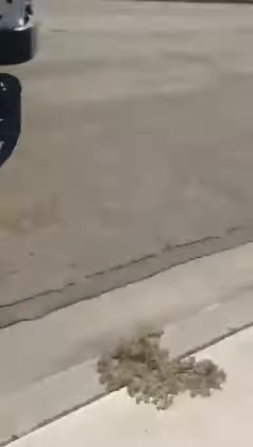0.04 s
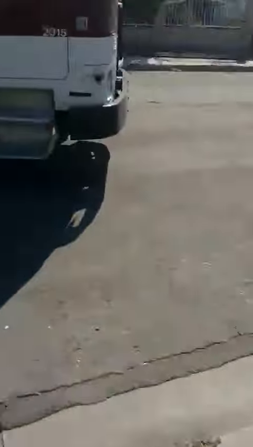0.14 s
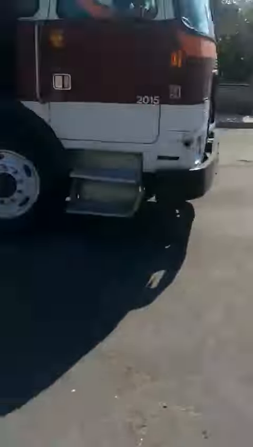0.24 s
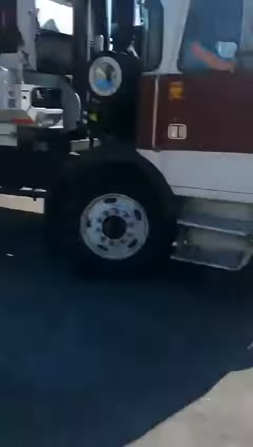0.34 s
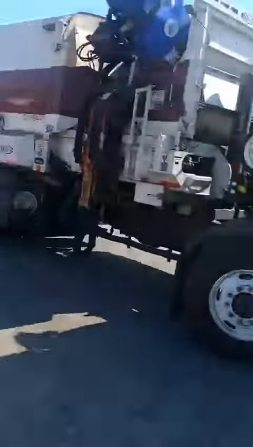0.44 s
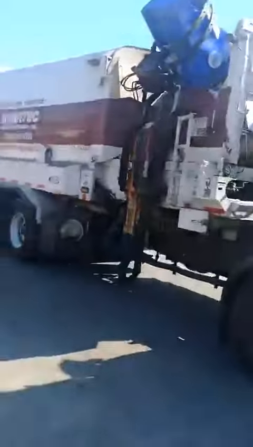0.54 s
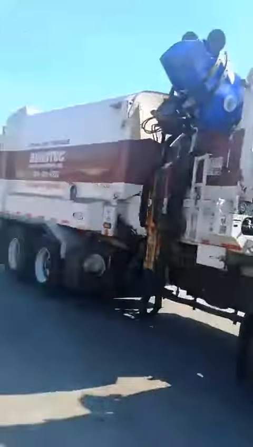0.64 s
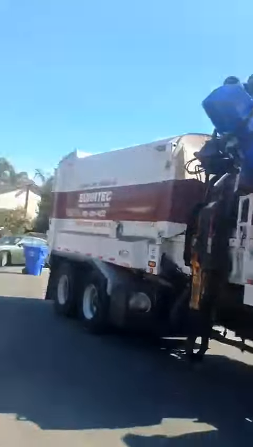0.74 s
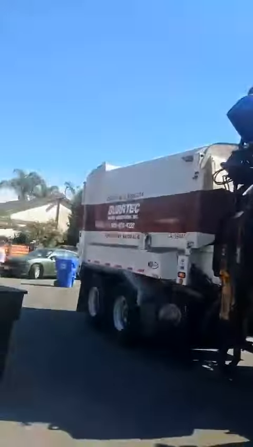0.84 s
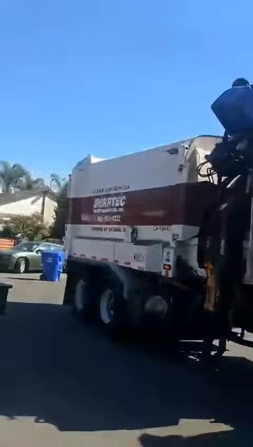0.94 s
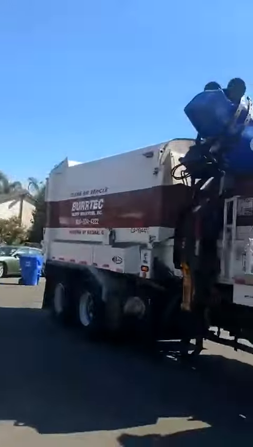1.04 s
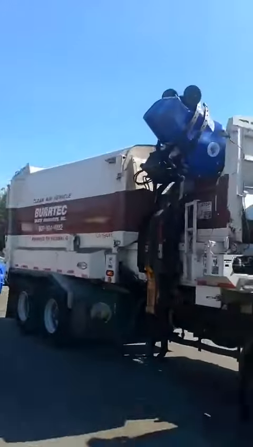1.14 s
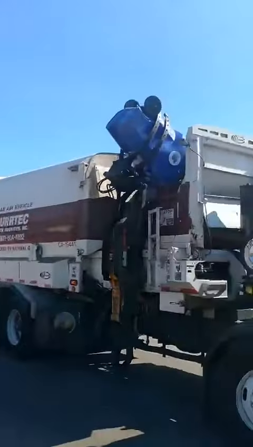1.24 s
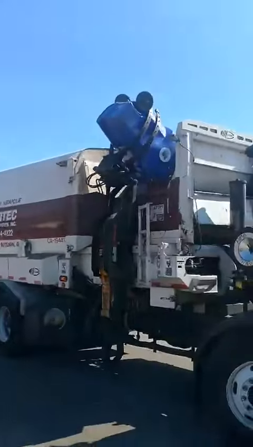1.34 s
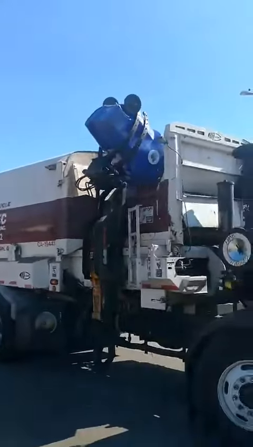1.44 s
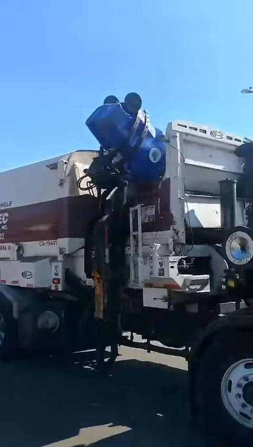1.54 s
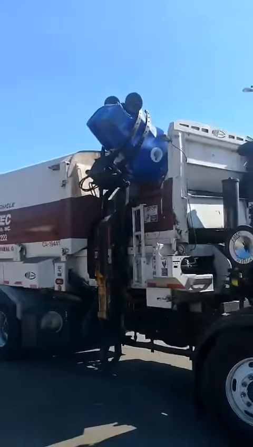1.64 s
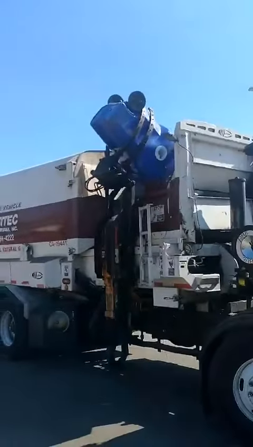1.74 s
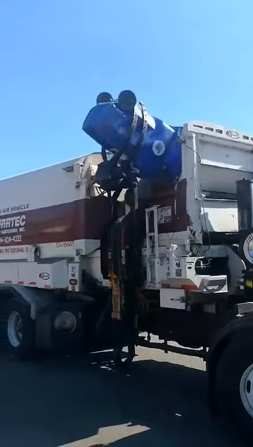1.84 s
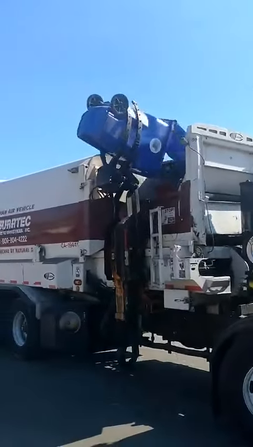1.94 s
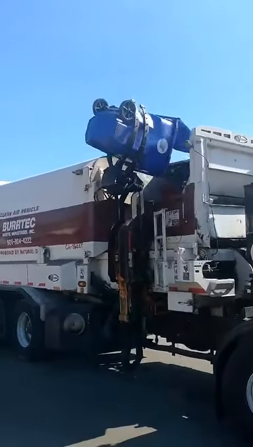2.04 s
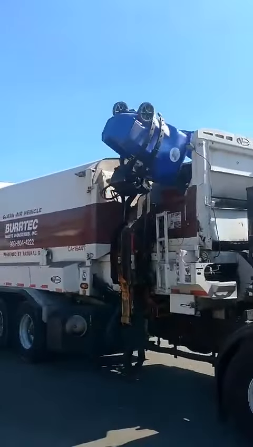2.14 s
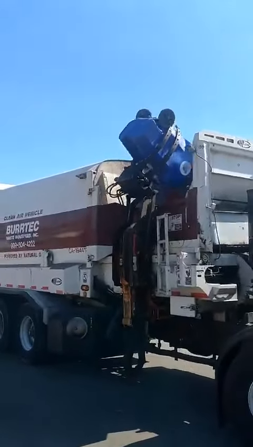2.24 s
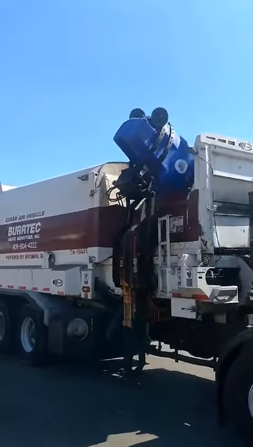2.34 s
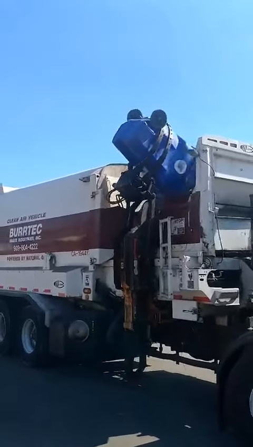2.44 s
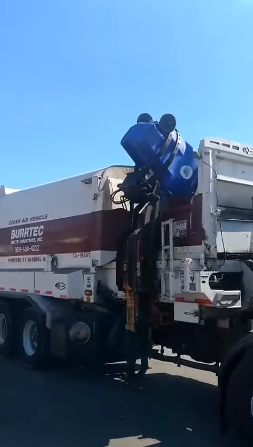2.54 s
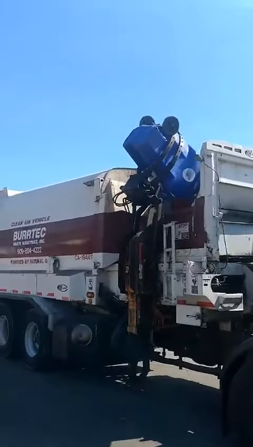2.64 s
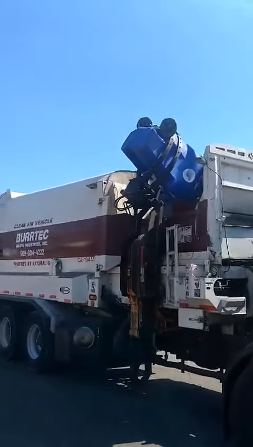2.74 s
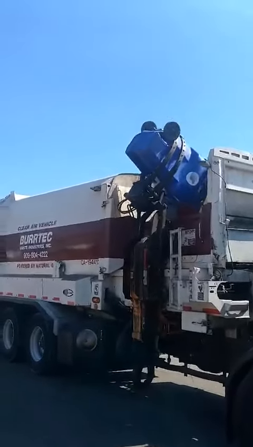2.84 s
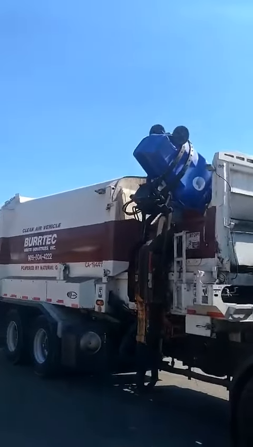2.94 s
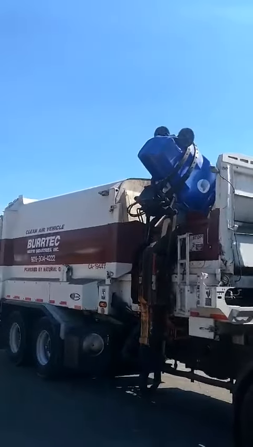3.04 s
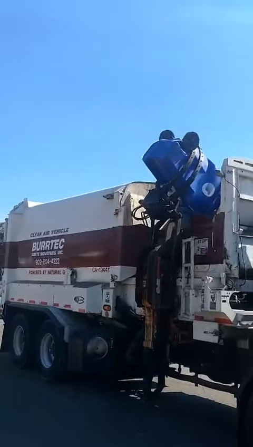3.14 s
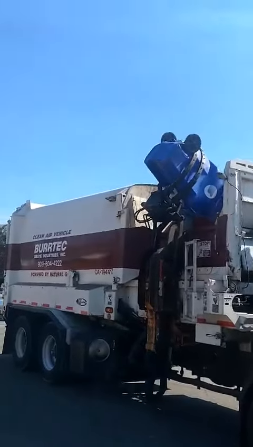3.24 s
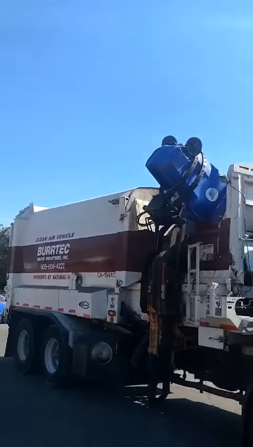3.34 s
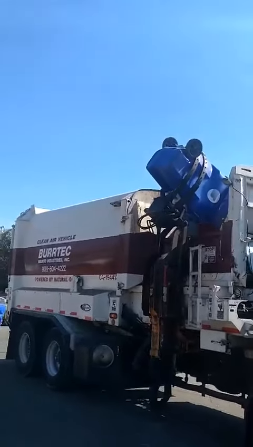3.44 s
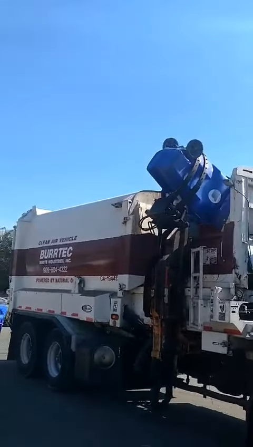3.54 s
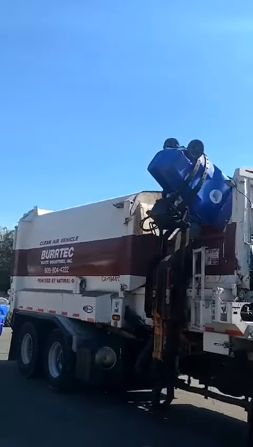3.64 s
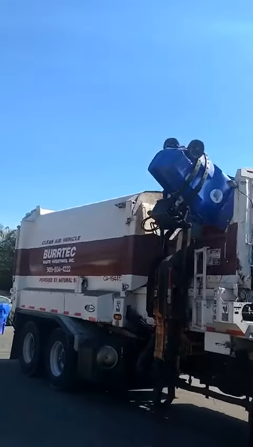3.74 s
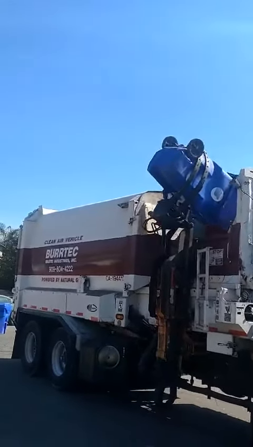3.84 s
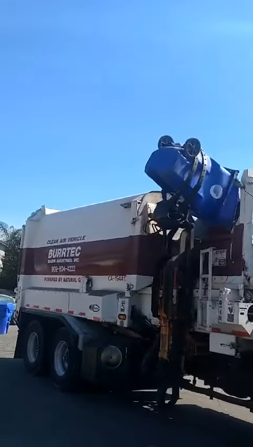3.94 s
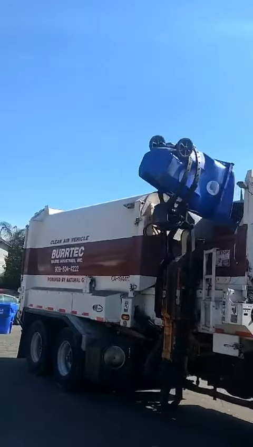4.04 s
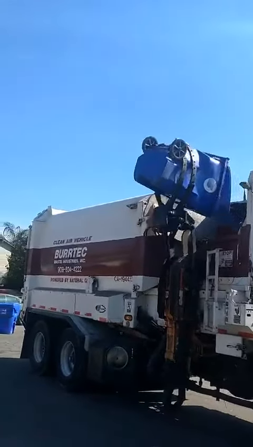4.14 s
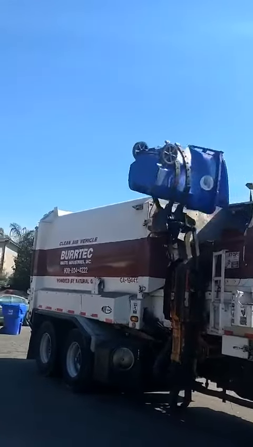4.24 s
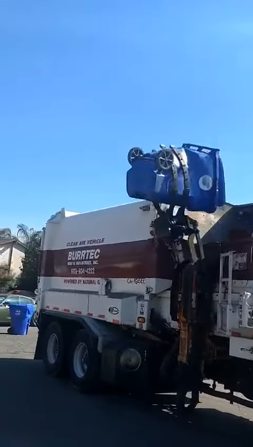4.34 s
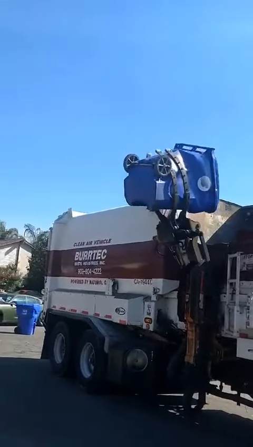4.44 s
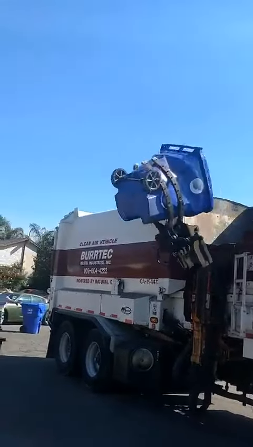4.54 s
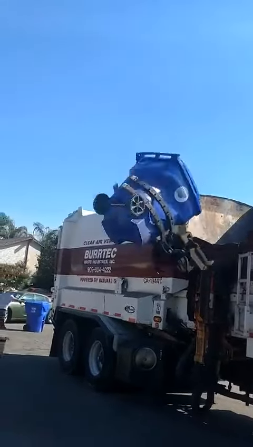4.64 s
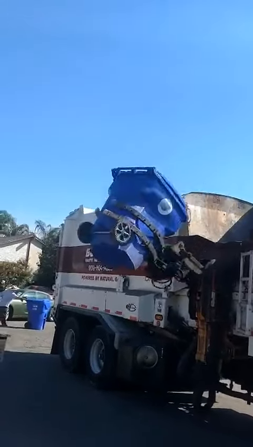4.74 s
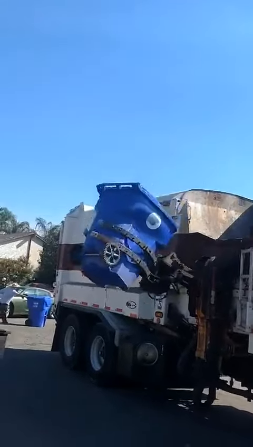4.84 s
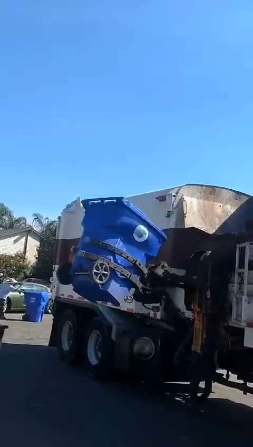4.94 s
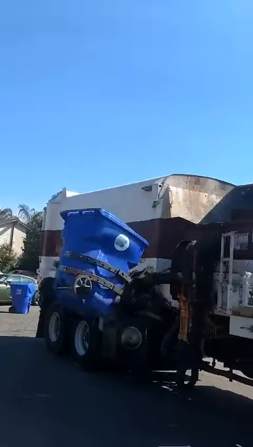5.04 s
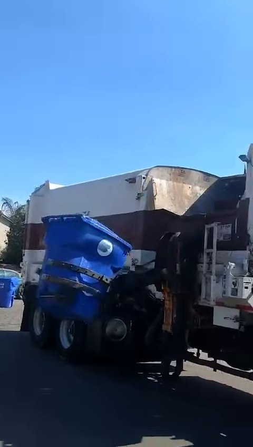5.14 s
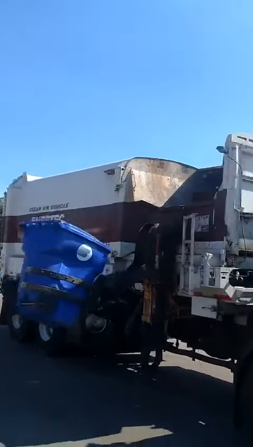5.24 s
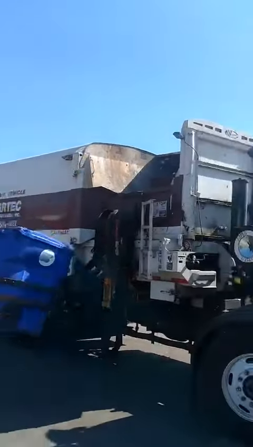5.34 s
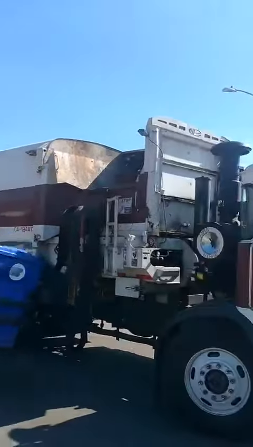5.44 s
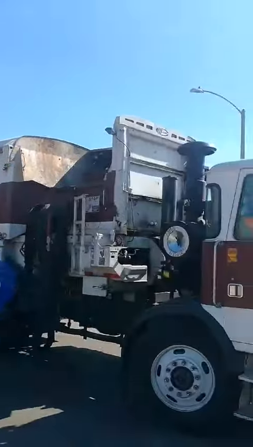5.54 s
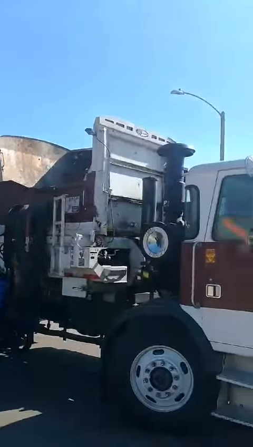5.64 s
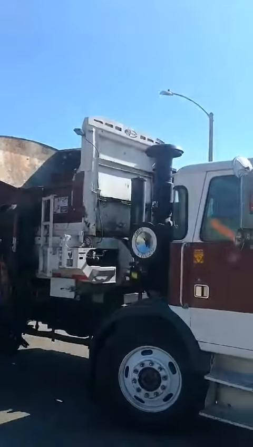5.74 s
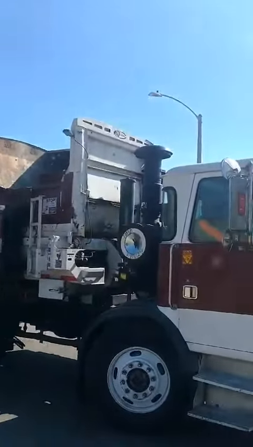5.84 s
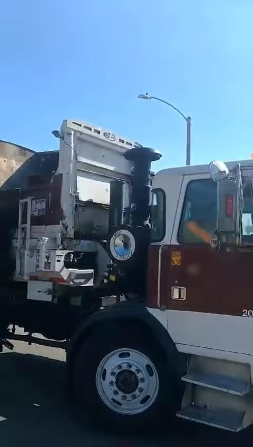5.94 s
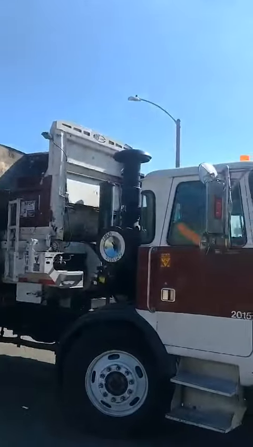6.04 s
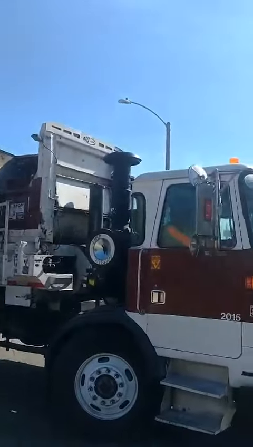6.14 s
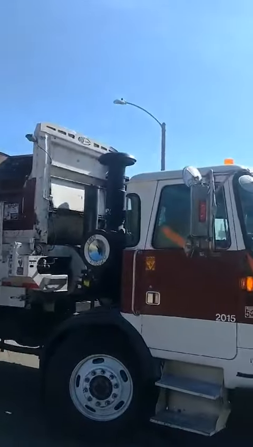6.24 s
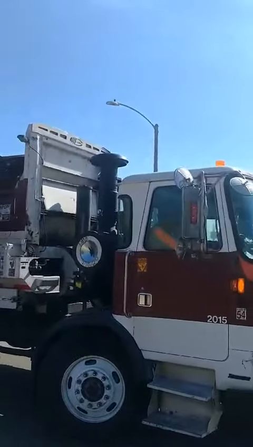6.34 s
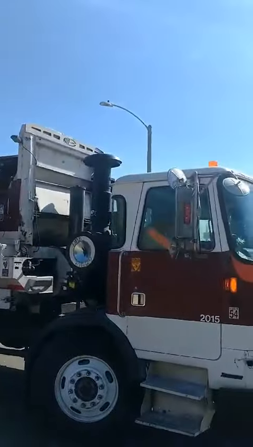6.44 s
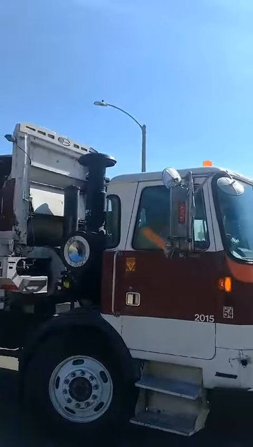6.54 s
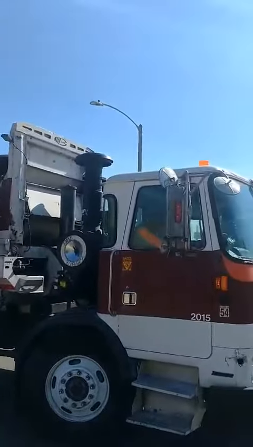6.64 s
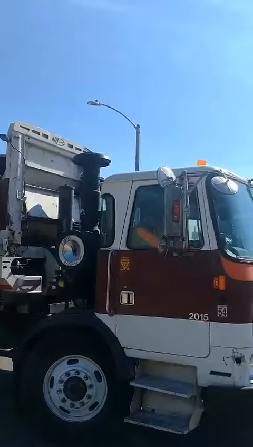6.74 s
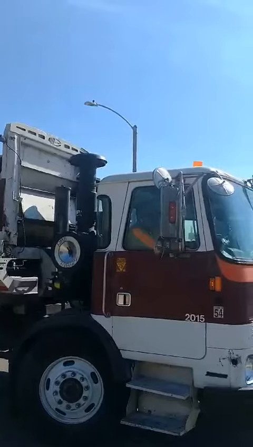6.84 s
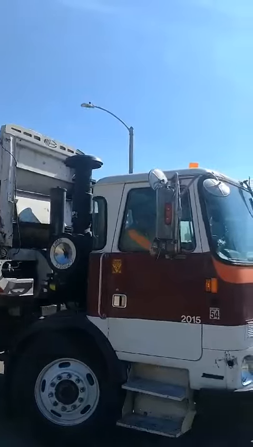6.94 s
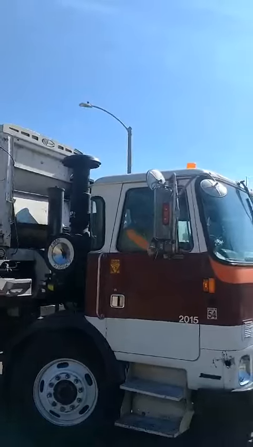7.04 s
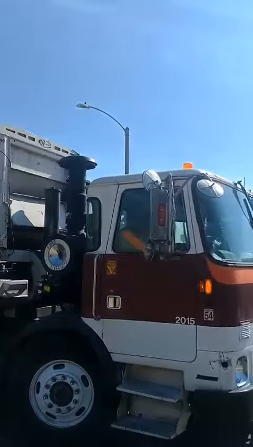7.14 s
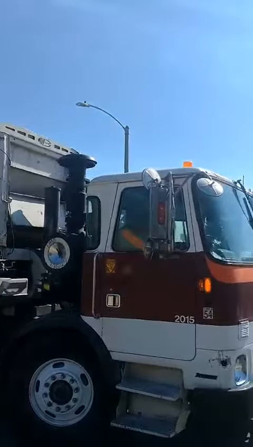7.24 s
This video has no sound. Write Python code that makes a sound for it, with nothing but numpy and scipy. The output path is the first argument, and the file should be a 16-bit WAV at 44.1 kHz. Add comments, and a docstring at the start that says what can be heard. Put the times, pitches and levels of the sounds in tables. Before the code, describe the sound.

Outdoors on a street, very close, a garbage truck idles with a deep throb of around 36 to 40 firings per second under a coarse pump whir. From 0 to 0.9 s a plastic bin is shaken hard against the steel hopper: loud cracks, boomy thuds, dense rattle, short falling moans and a thin pulsing squeak. From 1 to 2 s it eases to scattered clinks and knocks with narrow valve whine. From 2.05 to 3.3 s violent shaking returns in quick bursts, hollow wall tones around 400 Hz and sharp bangs. From 3.5 to 4.5 s comes a lull of engine, hiss and faint moans. From 4.6 to 5.7 s the bin is lowered with moderate clunks and rumble. From 5.8 to 6.7 s a last run of cracks and thuds, then mostly idle until 7.3 s. Handheld stereo, left-heavy, muffled above 8 kHz, distorting on peaks.

```python
"""In a street, close by, a garbage truck idles: a throbbing engine of low orders, a whirring pump of coloured noise.
From the start its arm shakes a plastic bin over the steel hopper: noise rumbles and rattles under struck
cracks, thuds and clinks, with moans and hollow wall tones as gliding sines. After a lull with hissing valves
the bin is set down in further blows, and the listener turns from arm to cab.
Two close microphone ports in a moving hand, left side to the truck, overload on the loudest clatter."""
import sys
import numpy as np
from scipy import signal
from scipy.fft import rfft, irfft
from scipy.io import wavfile
from scipy.ndimage import uniform_filter1d

SR = 44100
rng = np.random.default_rng(int(sys.argv[2]) if len(sys.argv) > 2 else 0)


def wrap_up_sound(samples):
    """Save the sound to the file named by the first command line argument, as 16-bit audio."""
    columns = np.atleast_2d(samples).T
    # keep every value between -1 and 1, then stretch to whole-number steps
    tamed = np.clip(columns, -1, 1)
    steps = np.round(tamed * 32767).astype(np.int16)
    wavfile.write(sys.argv[1], SR, steps)


N = 321489
T = np.arange(N) / SR
HZ = np.fft.rfftfreq(N, 1 / SR)

# Levels in the tables are relative within their layer.
# Pump and fan from the street. Each row: time in seconds, level in dB.
WHIRR_LEVEL = [(0, -40.5), (.8, -25.5), (1.8, -29), (2.6, -23), (3.35, -33), (4.3, -36.5), (5.5, -32.5),
               (5.9, -32), (6.5, -33), (7.0, -34), (7.29, -32.5)]
# Their noise facing the arm, then facing the cab. Each row: frequency in Hz, density in dB per Hz.
WHIRR_FACING_ARM = [(50, -15), (100, -9), (209, -5.5), (389, -3), (659, -17.5), (1270, -3), (1420, -4),
                    (2150, -18.5), (3130, -15), (4150, -15.5), (4910, -19), (6630, -12.5), (8000, -21),
                    (10400, -66.5), (17600, -120)]
WHIRR_FACING_CAB = [(50, -15), (100, -11), (278, -7), (470, -5.5), (751, -19), (1070, -10), (1560, -17.5),
                    (2270, -14), (2960, -24.5), (3500, -10), (4230, -26), (7560, -8), (8000, -20),
                    (10400, -63), (17600, -120)]
# Resonances of the pump housing. Each row: frequency in Hz, width in Hz, level in dB.
HOUSING_MODES = [(3096, 94, -6.5), (4080, 180, -11.5), (4640, 51, -5.5), (1716, 210, -13), (5480, 200, -14)]
TURN_START_S, TURN_END_S = 5.45, 7  # the listener turns from arm to cab

# Idling engine. Each row: time in seconds, firing rate in Hz, first exhaust order in dB, second order in dB.
ENGINE_IDLE = [(0.0, 40.8, -39, -31), (0.16, 39.96, -22, -16.5), (1.13, 38.7, -23.5, -32),
               (1.3, 37.92, -22.5, -15), (1.58, 37.26, -21.5, -25.5), (1.72, 37.15, -33, -35),
               (1.86, 36.9, -30, -24), (2.58, 35.6, -32, -39), (3.02, 35.7, -38, -47),
               (3.6, 38.3, -27.5, -21.5), (4.22, 37.04, -35, -39), (4.41, 35.96, -34, -25),
               (5.54, 35.42, -33.5, -24.5), (5.81, 38.1, -33, -33), (6.15, 38.53, -27, -19),
               (6.5, 37.1, -36, -38), (6.64, 36.47, -29, -22.5), (7.29, 38.35, -38, -36)]
# Weaker exhaust orders. Each row: multiple of the firing rate, level in dB against the second order.
WEAK_EXHAUST_ORDERS = [(1.5, -23.5), (2.5, -17.5), (3, -18.5), (3.5, -20.5), (5, -19)]

# Spells in which a loose part squeaks. Each row: start in seconds, length in seconds, level in dB.
SQUEAK_SPELLS = [(0, 0.6, -13.5), (.64, 0.68, -17), (1.613, 0.02, -21), (1.778, 0.18, -14.5),
                 (2.176, 0.13, -17), (3.265, 0.11, -18), (4.755, 0.056, -26), (5.618, 0.15, -22),
                 (7.066, 0.14, -22)]
SQUEAK_HZ, SQUEAK_RISE_S, SQUEAK_FALL_DB_PER_S = 6403, 0.014, 108.5

# Oil whining through the valves, a row a stroke. Each row: start in seconds, length in seconds,
# first centre in Hz, last centre in Hz, first level in dB, last level in dB.
VALVE_STROKES = [(0.801, 1.16, 1290, 1235, -28.5, -26.5), (3.497, 0.64, 1420, 1396, -31, -35),
                 (4.33, 0.5, 1396, 1640, -36, -32)]
THROB_DB, THROB_TURN = 4, 0.34  # swing either way, and where in the crank turn (three firings) it peaks
SKIRT_SHARE = 0.35  # wide hiss beside the narrow whine

# Moans of cylinders and chains, and hollow tones of the bin walls. Each row: start in seconds,
# length in seconds, first pitch in Hz, last pitch in Hz, level in dB.
MOANS_AND_HOLLOW_TONES = [(0.413, 0.13, 312.2, 276, -11.5), (0.585, 0.032, 348, 270, -7),
                          (0.953, 0.018, 254.5, 246, -9.5), (1.275, 0.21, 519, 516, -22.5),
                          (1.529, 0.287, 244.5, 242.6, -23), (2.37, 0.27, 395, 402.4, -10.5),
                          (2.63, 0.17, 413.5, 370.7, -10), (2.536, 0.045, 920, 907, -6.5),
                          (3.887, 0.37, 384, 369.5, -32.5), (3.978, 0.43, 694, 678, -39.5),
                          (4.092, 0.17, 187.6, 184.6, -34), (4.36, 0.17, 472, 484, -28.5),
                          (4.55, 0.12, 441, 354, -24), (5.822, 0.052, 880.3, 946.5, -20.5),
                          (5.905, 0.07, 955, 953, -18), (6.93, 0.079, 435, 502, -29.5),
                          (7.04, 0.16, 495, 464, -32.5)]
CLEAN_DB, HOARSE_DB = -56, -26  # a tone is pure up to the first level, fully hoarse from the second
WAVER_HZ, TONE_RISE_S, TONE_FADE_S = 16, 0.025, 0.033  # waver for a first pitch of 450 Hz, in proportion

# Loose pieces and panels, struck. Each row: start in seconds, pitch in Hz, level in dB,
# 60 dB decay in seconds, blur of the pitch in Hz.
LOOSE_PIECES = [(0.04, 252, -3, 0.33, 52), (0.175, 77, -8, 0.21, 18), (0.09, 2420, -5, 0.074, 150),
                (0.3, 489, -4, 0.091, 54), (0.355, 1890, -19, 0.078, 120), (0.68, 475, -4, .12, 60),
                (1.3, 519, -14, 0.11, 69), (1.467, 4480, -14.5, .08, 220), (1.469, 3870, -15, 0.092, 150),
                (1.49, 4200, -18, .07, 100), (1.905, 3366, -12, 0.065, 100), (1.908, 6240, -11, 0.076, 150),
                (1.91, 7630, -21, .1, 120), (2.043, 5200, -14, .07, 150), (2.046, 6700, -12, 0.075, 150),
                (2.055, 6050, -17, .08, 120), (2.435, 423, -3, 0.12, 40), (2.548, 2050, -2, .07, 200),
                (2.635, 411, -2, 0.18, 40), (2.77, 1716, -10, .15, 200), (2.825, 248, -7.5, 0.094, 40),
                (2.865, 6960, -8, 0.094, 170), (2.87, 1160, -8, 0.11, 120), (3.108, 236, -3, .12, 40),
                (3.47, 1369, -13.5, 0.16, 60), (4.573, 409.8, -17, 0.17, 50),
                (4.901, 1302, -13, 0.096, 400), (4.903, 429.5, -3.5, 0.1, 40), (4.936, 408, -1.5, .08, 40),
                (5.068, 1720, -14, 0.1, 110), (5.075, 151, -10.5, .15, 30), (5.16, 3780, -21, 0.17, 300),
                (5.205, 1490, -14, 0.11, 100), (5.457, 2663, -16, 0.065, 150),
                (5.46, 3910, -16, 0.091, 150), (5.462, 1910, -15, 0.13, 92), (5.54, 3950, -21, 0.063, 80),
                (6.09, 80, -3.5, .4, 8), (6.115, 552, -8, 0.091, 79), (6.19, 391, -10.5, .1, 63),
                (6.285, 835, -20, .2, 60), (6.505, 928, -18, 0.13, 80), (6.585, 510, -10, .12, 65),
                (6.645, 113, -11, 0.13, 20)]
CLINK_RISE_TURNS, CLINK_RISE_S = 1.3, 0.0016  # cycles and seconds, added together

# Bouts of shaking, one list a bout. Each row: time in seconds, rumble of the walls in dB, rattle of the load in dB.
SHAKING_BOUTS = [
    [(0.0, 1, -2.5), (0.086, -4.5, -6), (0.272, -5, -11.5), (0.39, -11, -11.5)],
    [(0.42, -10, -17), (0.62, -15, -18), (0.664, -13, -10), (0.9, -17.5, -24)],
    [(0.98, -22, -20), (1.146, -20.5, -35.5), (1.3, -30, -16.5), (1.342, -19.5, -22), (1.46, -19.5, -20),
     (1.848, -36.5, -32.5), (1.914, -28, -14), (2.0, -29, -36)],
    [(2.04, -30, -22.5), (2.076, -11, -10), (2.13, -14.5, -8.5), (2.2, -10.5, -13.5), (2.32, -20.5, -28.5)],
    [(2.36, -12.5, -21.5), (2.4, -7, -2.5), (2.68, -9, -12.5), (2.716, -8.5, -5), (2.96, -14, -19.5)],
    [(2.99, -13, -13.5), (3.028, -13.5, -8), (3.07, -12, -19.5), (3.132, -8.5, -10.5), (3.272, -18, -25),
     (3.4, -35, -68)],
    [(4.3, -34, -34), (4.532, -39.5, -43), (4.6, -25, -35), (4.694, -40, -38), (4.83, -28.5, -32),
     (4.884, -19, -35.5)],
    [(4.905, -18, -19), (4.955, -17, -27), (4.975, -13.5, -25), (5.02, -13.5, -24.5)],
    [(5.05, -15.5, -25.5), (5.284, -15, -28.5), (5.398, -19.5, -36), (5.474, -16.5, -27), (5.53, -15, -27),
     (5.6, -28, -32), (5.72, -28.5, -55)],
    [(5.8, -32, -34), (5.864, -46, -18.5), (6.05, -50, -41)],
    [(6.098, -16, -16), (6.236, -20.5, -24.5), (6.328, -14.5, -16), (6.42, -33, -33.5),
     (6.51, -16.5, -19.5), (6.676, -15.5, -34), (6.754, -29.5, -47), (6.8, -27, -45.5)],
]
# Colour, a row a bout. Each row: cut of the rattle's low half in dB, lift of the rumble's bass in dB.
BOUT_TONE = [(-5.5, -1), (-3.5, 2.5), (3, 7), (-4.5, 1), (-1.5, 0), (0.5, 3), (-2, -14), (-9.5, -17),
             (-11, 6.5), (-2.5, -1), (-4, 4)]
# Noise of heavy, then light pieces. Each row: frequency in Hz, density in dB per Hz.
RUMBLE_SPECTRUM = [(29, -38), (50, -5.5), (76, -8), (147, -1), (398, -3), (449, -5.5), (492, 1),
                   (651, -15.5), (1200, -11), (1560, -26), (2640, -120)]
RATTLE_SPECTRUM = [(350, -27.5), (600, -7), (714, -8), (896, -3), (1430, -8.5), (1890, -7), (2480, -10),
                   (5070, -12.5), (7180, -11), (8000, -14.5), (10400, -18), (17600, -120)]
# Resonances of bin and hopper walls, of the arm's steel, and the broad ones of its joints under a blow.
# Each row: frequency in Hz, width in Hz, level in dB.
WALL_MODES = [(73.3, 9.3, 2), (259.6, 27, -9), (328, 150, -9.5), (392, 33, -4), (519, 4.4, -6),
              (904, 28, -14.5)]
STEEL_MODES = [(1780, 130, -10), (2380, 89, -20), (2977, 22, -4), (3860, 54, -16), (4387, 41, -11.5),
               (6260, 24, -21.5)]
JOINT_MODES = [(1110, 170, -7), (1400, 170, -1), (1930, 420, -5.5), (6330, 400, -26.5)]

# Blows. Each row: start in seconds, crack on the steel in dB, thud on the walls in dB,
# 60 dB decay in seconds (held to 0.02-0.6 when played).
BLOWS = [(0.099, 7.5, -6.5, 0.22), (0.294, -1, 8.5, 0.87), (0.457, -6.5, -1.5, 0.49),
         (0.576, -7.5, -5, 0.18), (0.662, -3.5, -2.5, 0.13), (0.746, -4, -4.5, 0.14),
         (1.2625, -25, -41, 0.11), (1.301, -9.5, -9, 0.18), (1.468, -9, -38, 0.29), (1.906, -7, -1.5, 0.21),
         (2.044, -7.5, -38, 0.28), (2.074, -12, -12, 0.0302), (2.107, -11.5, 4.5, 0.67),
         (2.3454, -8, -19, 0.4), (2.381, 3.5, -7, 0.18), (2.5485, -4.5, -0.5, 0.13), (2.701, -20, -3, 0.58),
         (2.864, -3.5, -23, 0.049), (2.9188, -1.5, -28, 0.064), (2.9975, -5.5, -20, 0.64),
         (3.09, 0.5, -24, 0.53), (3.4693, -26, -30, 0.19), (3.763, -23, -19, 0.067),
         (4.3495, -18.5, -31, 0.27), (4.571, -23, -24, 0.51), (4.83, -17, -19, 0.23),
         (4.9007, -10, -13, 0.1), (4.975, -11, -16.5, 0.56), (5.067, -5.5, -0.5, 0.16),
         (5.1642, -12.5, -14, 0.57), (5.245, -9.5, -16, 0.41), (5.445, -10.5, -12, 0.35),
         (5.456, -6.5, -28, 0.25), (5.834, -23.5, -14, 0.4), (6.087, 1.5, -14, 0.21),
         (6.095, -10.5, -5, 0.14), (6.138, -8, -11, 0.54), (6.189, -23, -3.5, 0.21),
         (6.2956, -11.5, -7, 0.24), (6.4497, -13, -38.5, 0.14), (6.5206, -20, -19, 0.17),
         (6.5894, -17, -25, 0.41)]
CRACK_RISE_S, THUD_RISE_S, THUD_FASTER = 0.002, 0.0049, 1.45  # the push on the walls dies this much faster

# What the two microphone ports share. Each row: frequency in Hz, share from 0 to 1.
PORT_LIKENESS = [(30, 0.97), (120, 0.95), (300, 0.94), (550, 0.8), (850, 0.7), (1250, 0.6), (2000, 0.2),
                 (4000, 0.1), (8000, 0.25)]
# Head start of the left port, shorter below 500 Hz than above 1250 Hz. Each row: frequency in Hz, lead in seconds.
LEFT_LEAD = [(500, 0.00015), (1250, 0.00026)]
# Swings of the hand. Each row: time in seconds, left minus right in dB before the share below.
HAND_SWING = [(0.0, 0.5), (1.04, 6.5), (1.6, 4.5), (1.78, 4.5), (3.29, 3), (3.45, 9.5), (4.08, 9),
              (4.79, 6), (6.27, 5), (6.78, 9.5), (7.29, 3)]
# How the body shadows a port. Each row: frequency in Hz, share of the swing heard (negative leans the other way).
BODY_SHADOW = [(60, 0.05), (270, 0.19), (550, 0.51), (850, -0.93), (1250, 1.2), (2200, 0.97), (4000, 1.55),
               (8000, 1.26)]
MIC_HZ, EDGE_HZ, KNEE = 7800, 16000, 0.8  # microphone limit, final limit, level where overload begins


def amp(db):
    """Decibels to gain."""
    return 10 ** (np.asarray(db) / 20)


def evened(x):
    """Scales to rms 1."""
    return x / np.sqrt(np.mean(x ** 2) + 1e-20)


def read(points, hz=HZ):
    """Reads a spectrum table on a frequency grid, straight in log frequency."""
    f, value = np.transpose(points)
    return np.interp(np.log(hz + 1), np.log(f + 1), value)


def columns(rows, t=T):
    """The columns of a curve table, joined by straight lines over time."""
    s, *rest = np.transpose(rows)
    return [np.interp(t, s, c) for c in rest]


def coloured(x, points):
    """Gives x the spectrum of a table, rms 1."""
    return evened(irfft(rfft(x) * amp(read(points)), N))


def filtered(x, hz, kind="low"):
    """Second-order low or high pass."""
    return signal.sosfilt(signal.butter(2, hz, kind, fs=SR, output="sos"), x)


def ring(x, modes):
    """Two-pole resonances, each of equal peak gain, summed at their levels."""
    out = np.zeros_like(x)
    for hz, width, db in modes:
        r = np.exp(-np.pi * width / SR)
        gain = (1 - r * r) / 2
        poles = [1, -2 * r * np.cos(2 * np.pi * hz / SR), r * r]
        out += amp(db) * signal.lfilter([gain, 0, -gain], poles, x)
    return out


def drift(seconds):
    """Slow chance of rms 1 that changes over the given time."""
    span = max(round(seconds * SR), 1)
    return evened(uniform_filter1d(uniform_filter1d(rng.standard_normal(N), span), span))


def knocks(per_s, spread_db, decay_s):
    """Envelope of random knocks of uneven size, each dying quickly."""
    sizes = amp(spread_db * np.minimum(rng.exponential(1, N), 4))
    hits = sizes * (rng.random(N) < per_s / SR)
    return evened(np.sqrt(signal.lfilter([1], [1, -np.exp(-2 / (decay_s * SR))], hits ** 2)))


def inside(start, end, fade_s):
    """1 between two times, with short fades outside them."""
    return np.clip(np.minimum(T - start + fade_s, end + fade_s - T) / fade_s, 0, 1)


def whirr():
    """Flow noise that rings in the pump housing and flickers."""
    noise = rng.standard_normal((2, N))
    turned = np.interp(T, [TURN_START_S, TURN_END_S], [0, 1])
    noise = (1 - turned) * coloured(noise, WHIRR_FACING_ARM) + turned * coloured(noise, WHIRR_FACING_CAB)
    noise = noise + amp(12.0) * ring(noise, HOUSING_MODES) * amp(2.0 * drift(0.099))
    level_db = columns(WHIRR_LEVEL)[0] + 6.0 + 1.8 * drift(0.022)
    return amp(level_db) * evened(noise)


def exhaust(firings, first_db, second_db):
    """Clean sines at low orders of the firing rate, the weak ones unsteady."""
    weak = sum(amp(db) * np.sin(2 * np.pi * (k * firings + rng.random())) for k, db in WEAK_EXHAUST_ORDERS)
    second = amp(second_db) * (np.sin(4 * np.pi * firings + 1.0) + weak * amp(5.9 * drift(0.076)))
    first = amp(first_db) * np.sin(2 * np.pi * firings)
    return np.sqrt(2) * (first + second)


def squeak(firings):
    """A short scrape at each firing, of uneven strength, rings one small part; spells set in fast and die away."""
    strength = amp(2.8 * rng.standard_normal(400))[firings.astype(int)]
    scrape = strength * np.exp(-(firings % 1) / 0.28) * rng.standard_normal(N)
    mode = [(SQUEAK_HZ, 200, 0)]
    spells = []
    for s, length, db in SQUEAK_SPELLS:
        fall_db = SQUEAK_FALL_DB_PER_S * np.maximum(T - s - length, 0)
        spells.append(amp(db - fall_db) * np.clip((T - s) / SQUEAK_RISE_S, 0, 1))
    return amp(-12.5) * np.max(spells, axis=0) * evened(ring(ring(scrape, mode), mode))


def valves(firings):
    """Oil flow as narrow noise on a gliding pitch, with a wider skirt, throbbing with the crank."""
    out = np.zeros((2, N))
    for side in out:
        core, skirt = (drift(s) + 1j * drift(s) for s in (0.012, 0.0015))
        throb_db = THROB_DB * np.cos(2 * np.pi * (firings / 3 - THROB_TURN))
        breath = amp(drift(0.02) + throb_db) * (1 + 0.5 * core + SKIRT_SHARE * skirt)
        for s, length, first_hz, last_hz, first_db, last_db in VALVE_STROKES:
            hz, level_db = columns([(s, first_hz, first_db), (s + length, last_hz, last_db)])
            carrier = np.exp(2j * np.pi * np.cumsum(hz) / SR)
            side += amp(level_db - 3.0) * inside(s, s + length, 0.04) * (breath * carrier).real
    return out


def moans_and_hollow_tones():
    """A gliding tone with a faint octave; the louder, the more it wavers and rasps."""
    waver, rasp = WAVER_HZ * drift(0.005), 0.45 * drift(0.002)
    flutter_db, out = 1.4 * drift(0.011), np.zeros(N)
    for s, length, first_hz, last_hz, db in MOANS_AND_HOLLOW_TONES:
        end = s + length
        on = (T > s - TONE_RISE_S) & (T < end + TONE_FADE_S)
        hoarse = np.clip((db - CLEAN_DB) / (HOARSE_DB - CLEAN_DB), 0, 1)
        hz = np.interp(T[on], [s, end], [first_hz, last_hz]) + hoarse * waver[on] * first_hz / 450
        turns = np.cumsum(hz) / SR
        tone = (1 + hoarse * rasp[on]) * np.sin(2 * np.pi * turns) + amp(-16.5) * np.sin(4 * np.pi * turns)
        swell = np.interp(T[on], [s - TONE_RISE_S, s, end, end + TONE_FADE_S], [0, 1, 1, 0]) ** 2
        out[on] += amp(db) * swell * tone
    return amp(flutter_db) * out


def clinks():
    """Each piece rings on its own pitch, blurred by chatter, and dies; the ports hear the chatter differently."""
    t, out = np.arange(8000) / SR, np.zeros((2, N + 8000))
    chatter = rng.standard_normal((len(LOOSE_PIECES), 2, 2, 8000))
    for (s, hz, db, t60, blur_hz), (a, b) in zip(LOOSE_PIECES, chatter):
        r = np.exp(-np.pi * blur_hz / SR)
        start = np.zeros((2, 1)) + 1j
        blur = signal.lfilter([np.sqrt(1 - r * r)], [1, -r], a + 1j * b, zi=start)[0]
        rise = 1 - np.exp(-t / (CLINK_RISE_S + CLINK_RISE_TURNS / hz))
        shape = amp(db - 60 * t / max(t60, 0.02)) * rise
        tone = ((1.03 + 0.56 * blur) * np.exp(2j * np.pi * hz * t)).imag
        out[:, round(s * SR):][:, :len(t)] += shape * tone
    return out[:, :N]


def shaking():
    """Heavy pieces thump the walls; light ones rattle on the steel; each bout has its own colour."""
    thumps = coloured((0.5 + knocks(60, 1.9, 0.046)) * rng.standard_normal((2, N)), RUMBLE_SPECTRUM)
    rumble = evened(thumps + amp(4.5) * ring(thumps, WALL_MODES))
    ticks = coloured((0.9 + knocks(220, 2.2, 0.006)) * rng.standard_normal((2, N)), RATTLE_SPECTRUM)
    ticks = evened(ticks + amp(4.5) * ring(ticks, STEEL_MODES) * amp(4.0 * drift(0.03)))
    low, bass = filtered(ticks, 2000), filtered(rumble, 300)
    out = np.zeros((2, N))
    for rows, (thin_db, bass_db) in zip(SHAKING_BOUTS, BOUT_TONE):
        rumble_db, rattle_db = columns(rows)
        # a negative cut thickens the rattle
        rattle = amp(rattle_db + 0.5) * (amp(-thin_db) * low + ticks - low)
        walls = amp(rumble_db - 1.0) * (rumble + (amp(bass_db) - 1) * bass)
        out += inside(rows[0][0], rows[-1][0], 0.021) * (walls + rattle)
    return out


def bangs():
    """Each blow is a quick crack on the steel and the joints and a slower thud in the walls."""
    crack, thud = rng.standard_normal((2, 2, N))
    crack = crack * (1.8 + knocks(300, 2.2, 0.004))  # parts rattle after the blow
    crack = signal.lfilter([1], [1, -0.5], crack)  # duller towards the top
    crack = 0.5 * crack + amp(0.5) * ring(crack, STEEL_MODES + JOINT_MODES)
    crack = evened(filtered(crack, 600, "high"))
    power, t = np.zeros((2, N + 16000)), np.arange(16000) / SR
    for s, crack_db, thud_db, t60 in BLOWS:
        fall_db = -60 * t / np.clip(t60, 0.02, 0.6)
        snap = amp(fall_db) * (1 - np.exp(-t / CRACK_RISE_S))
        push = evened(amp(THUD_FASTER * fall_db) * (1 - np.exp(-t / THUD_RISE_S)))  # equal energy for all
        blow = np.array([amp(crack_db - 4.5) * snap, amp(thud_db - 21.5) * push])
        power[:, round(s * SR):][:, :len(t)] += blow ** 2
    snaps, pushes = np.sqrt(power[:, :N])
    return snaps * crack + ring(pushes * thud, WALL_MODES) / ring(thud, WALL_MODES).std()


def ports(pair):
    """The left port hears the shared sound earlier, mixed with a second sound of its own."""
    shared, own = rfft(pair, 2 * N)
    hz = np.fft.rfftfreq(2 * N, 1 / SR)
    like = np.clip(read(PORT_LIKENESS, hz), 0, 1)
    early = shared * np.exp(2j * np.pi * hz * read(LEFT_LEAD, hz))
    left = like * early + np.sqrt(1 - like ** 2) * own
    return irfft(np.array([left, shared]), 2 * N)[:, :N]


def hollows_and_swing(spread, direct):
    """Random hollows drift through whirr, squeak and shaking; direct sounds stay whole; the body shadows one port."""
    hz, t, z = signal.stft(np.array([spread, direct]), SR, nperseg=1024, noverlap=768)
    patches = uniform_filter1d(rng.standard_normal(z.shape[2:]), size=4, axis=0)
    patches = evened(uniform_filter1d(patches, size=11, axis=1))
    patches = np.where(patches < -0.6, 3.37 * patches + 0.58, 0.34 * patches)  # hollows run deep, peaks stay low
    patches_db = 3.3 * patches * np.clip(hz / 900, 0, 1)[:, None]
    lean_db = read(BODY_SHADOW, hz)[:, None] * columns(HAND_SWING, t)[0] / 2
    heard = (z[0] * amp(patches_db) + z[1]) * amp(np.array([lean_db, -lean_db]))
    return signal.istft(heard, SR, nperseg=1024, noverlap=768)[1][:, :N]


def scene():
    """Engine, arm and bin as the two ports hear them."""
    firing_hz, first_db, second_db = columns(ENGINE_IDLE)
    firings = np.cumsum(firing_hz) / SR
    spread = whirr() + squeak(firings) + shaking()
    tones = exhaust(firings, first_db, second_db) + moans_and_hollow_tones()
    shared_only = np.array([[1], [0]])  # the tones add nothing of the left port's own
    direct = tones * shared_only + valves(firings) + clinks() + bangs()
    return hollows_and_swing(ports(spread), ports(direct))


def record(dry):
    """The microphone path ends in the mid treble; the stage after it overloads; then the band limit."""
    mic = signal.firwin(1023, MIC_HZ, window=("kaiser", 10), fs=SR)
    narrow = signal.oaconvolve(dry, mic[None], "same")
    over = np.maximum(abs(narrow) - KNEE, 0)
    bent = np.clip(narrow, -KNEE, KNEE) + np.sign(narrow) * (1 - KNEE) * np.tanh(over / (1 - KNEE))
    edge = signal.firwin(255, EDGE_HZ, window=("kaiser", 9), fs=SR)
    return np.clip(signal.oaconvolve(bent, edge[None], "same"), -1, 1)


dry = scene()
out = record(dry)
wrap_up_sound(out)
```